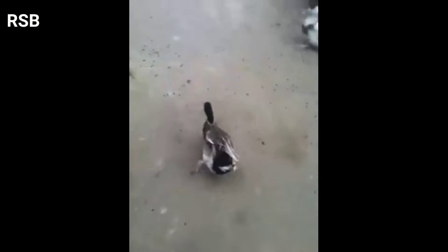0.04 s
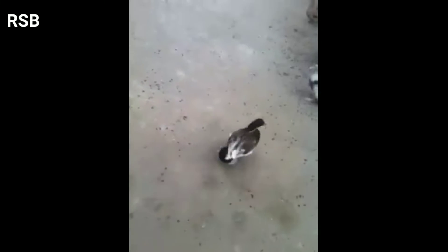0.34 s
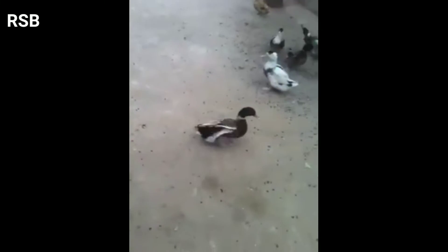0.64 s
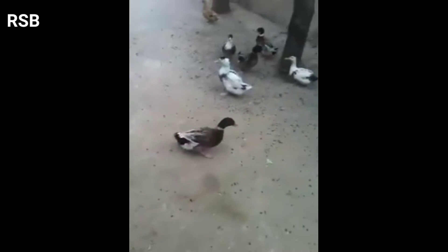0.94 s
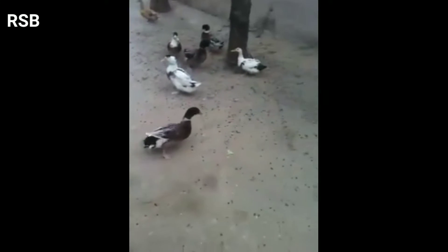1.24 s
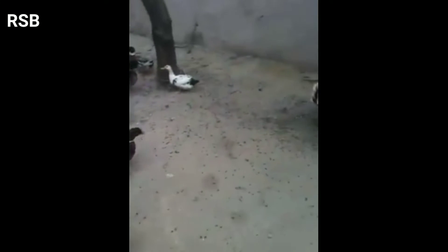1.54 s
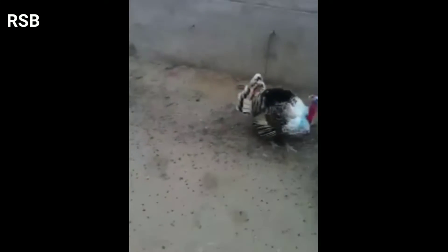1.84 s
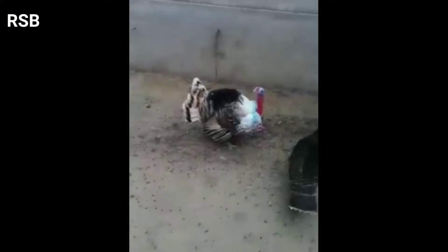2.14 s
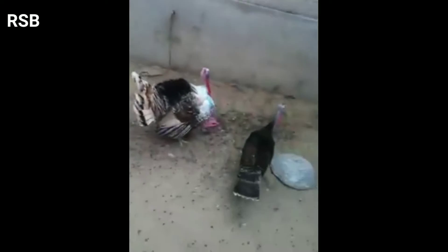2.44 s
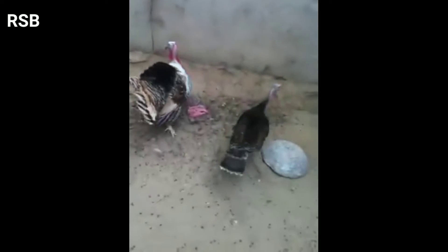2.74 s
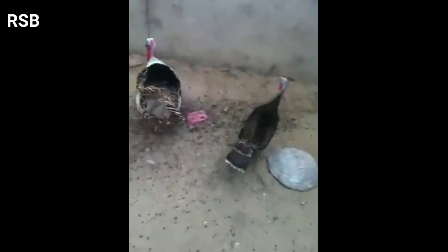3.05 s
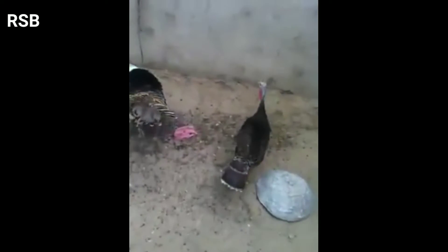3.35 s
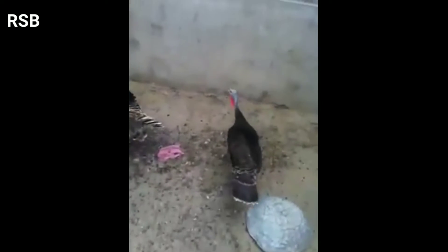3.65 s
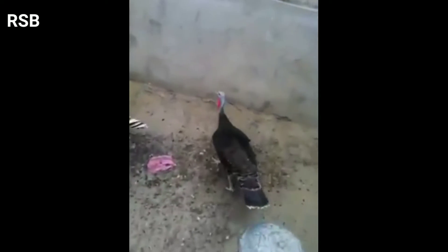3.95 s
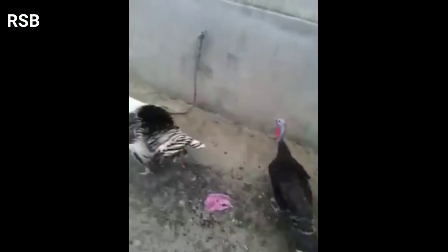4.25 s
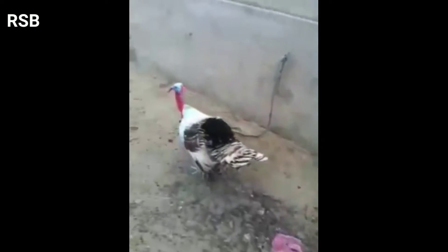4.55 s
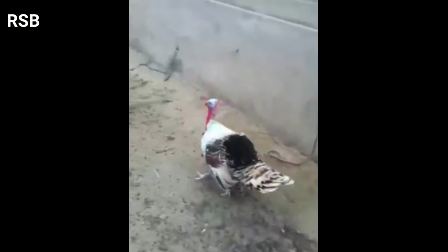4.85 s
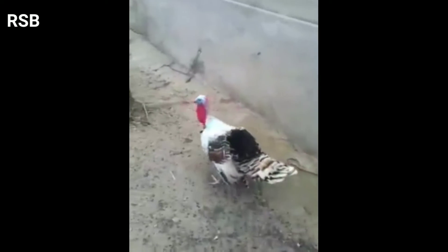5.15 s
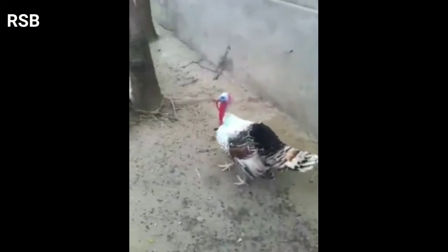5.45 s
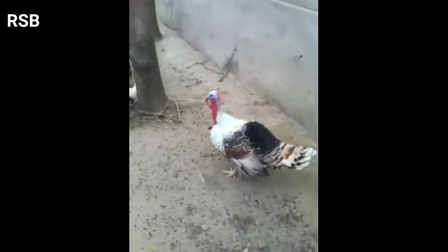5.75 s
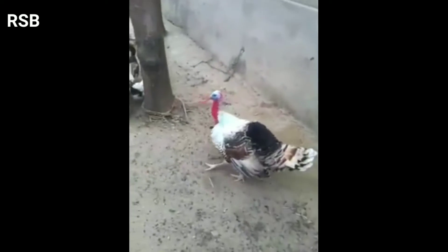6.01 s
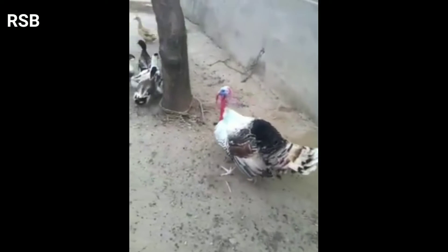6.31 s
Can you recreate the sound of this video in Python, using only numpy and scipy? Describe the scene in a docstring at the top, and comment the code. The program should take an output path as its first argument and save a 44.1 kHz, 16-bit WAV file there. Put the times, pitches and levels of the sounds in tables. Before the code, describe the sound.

One loud turkey yelp and gobble, followed by quiet raspy ducks, a few high peeps and light scuffs on dirt outdoors.

```python
"""A walled farmyard opens on outdoor air, a duck's hiss, soft bumps on the microphone and a faint far call.
At 0.24 s a close turkey yelps, overloading the microphone, then gobbles until 1.1 s: its syrinx sounds
a fast run of notes that leap in pitch and break up, shaped by windpipe and mouth. Behind it young birds
begin to peep and ducks keep up hisses (air through the bill) and rasps (flapping in the throat).
From 3.8 s feet scuff the dirt, and two more far calls come near the end. The walls return short echoes."""
import sys
import numpy as np
from scipy import signal
from scipy.fft import rfft, irfft, next_fast_len
from scipy.io import wavfile
from scipy.ndimage import map_coordinates

SR = 44100
rng = np.random.default_rng(int(sys.argv[2]) if len(sys.argv) > 2 else 0)


def unload_wav(signal):
    """Save mono or channel-first audio to the path in sys.argv[1] as 16-bit WAV at rate SR, clipped to [-1, 1]."""
    wavfile.write(
        sys.argv[1],
        SR,
        np.round(np.clip(np.atleast_2d(signal).T, -1, 1) * 32767).astype(np.int16),
    )


N = 281358

# Levels are relative within each table.
# outdoor background: (time [s], level [dB])
AIR_LEVELS = [(0, -44.5), (2.6, -49), (6.4, -48)]
# duck hisses: (centre time [s], level [dB], bill resonance [Hz])
HISS_PUFFS = [(.01, -54.5, 6070), (.18, -51, 4160), (1.069, -44, 3260), (1.26, -48.5, 3330),
              (1.426, -49, 5100), (1.59, -49.5, 5320), (1.887, -50, 5330), (2.137, -52, 4950),
              (2.507, -52.5, 5360), (2.754, -48.5, 3450), (2.931, -45.5, 3520), (3.161, -46, 4150),
              (3.358, -47, 5850), (3.57, -47.5, 5400), (3.803, -48.5, 4300), (4.437, -47, 3450)]
# bumps on the microphone: (time [s], thud level [dB], click level [dB])
MIC_BUMPS = [(.048, -32, -31), (0.058, -41, -53), (.072, -33.5, -45)]
# far calls and peeps: (start [s], end [s], first pitch [Hz], last pitch [Hz], level [dB])
FAR_NOTES = [(.13, .225, 337, 339, -49), (5.14, 5.33, 1220, 1184, -53), (5.86, 5.95, 983, 880, -45.5)]
PEEP_NOTES = [(1.115, 1.178, 3166, 4160, -48), (4.468, 4.535, 3165, 4200, -48.5),
              (5.045, 5.075, 3280, 3620, -47), (5.093, 5.135, 3550, 3240, -38.5),
              (5.818, 5.872, 3600, 4050, -42), (5.885, 5.945, 3050, 3530, -41)]
# course of the yelp: (time [s], pitch [Hz], level [dB], roughness [0-1], mouth resonance [Hz])
YELP_CONTOUR = [(.24, 608, -24.5, 0.22, 2050), (.252, 602.7, -19, 0.16, 2140),
                (.264, 594.5, -23.5, 0.58, 1670), (.294, 662, -21, 0.28, 1660),
                (0.314, 678.6, -13, 0.18, 1890), (.319, 739, -4, 0.14, 1520), (.325, 772, -8.5, 0.2, 1440),
                (.341, 786, -5.5, 0.21, 1390), (.347, 827.4, -15, 0.5, 1420), (.361, 820, -10, 0.47, 880),
                (0.375, 862.5, -21, 0.5, 1050), (.4, 810, -21, 0.83, 900)]
# gobble notes: (start [s], end [s], mid pitch [Hz], level [dB], roughness [0-1],
# share of the note before the beak shuts [0-1], lower voice gain [0-1])
GOBBLE_NOTES = [(0.341, 0.379, 640, -18, 0.08, .8, 0), (.403, 0.419, 755, -13.5, .1, .05, 0),
                (0.418, 0.446, 746, -23.5, 0.72, 1, 0.02), (0.452, .467, 719, -15, 0.31, 0.5, 0.01),
                (0.49, .505, 625, -12, 0.19, 1, 0.02), (.508, 0.549, 698, -16, .5, 1, 0),
                (0.544, 0.569, 611, -14, 0.46, 1, 0.57), (.554, 0.599, 764, -15.5, 0.41, 0.73, 0.01),
                (0.602, 0.648, 657, -25.5, 0.92, 1, 0.03), (.648, 0.672, 672, -21.5, 0.26, 0.01, 0.1),
                (0.678, 0.696, 637, -21, 0.28, 1, 0), (0.693, .709, 636, -15, 0.2, 0.04, 0.02),
                (.797, .822, 683.5, -23.5, 0.29, 0, 0.59), (0.859, .925, 618, -24.5, 0.52, 0.89, 0.02),
                (0.872, 0.894, 696, -25, 0.33, 0, 0.01), (0.992, 1.018, 671, -25.5, 0.34, 0, 0.72),
                (1.06, 1.089, 575.7, -25, .3, 0.68, 0.51)]
# louder duck rasps: (start [s], nominal length [s], rattle level [dB], air level [dB])
LOUD_RASPS = [(1.246, 0.044, -38.5, -66), (1.448, 0.049, -35.5, -50), (1.705, 0.072, -67, -49.5),
              (1.847, 0.056, -43, -49), (2.267, 0.083, -47, -47.5), (2.49, 0.055, -39.5, -53.5),
              (2.579, 0.098, -47, -49.5), (2.812, 0.1, -43.5, -47.5), (3.053, 0.068, -38.5, -51.5),
              (3.145, 0.07, -47, -49), (3.355, 0.077, -50, -48), (3.46, 0.079, -40, -60),
              (3.539, 0.044, -48, -58), (3.709, 0.071, -41.5, -51.5), (3.787, 0.064, -45, -63),
              (4.118, 0.06, -39, -55), (4.307, 0.088, -37.5, -50.5), (4.513, 0.062, -45, -54),
              (4.687, 0.057, -37, -65), (4.869, 0.092, -42, -47.5), (5.037, 0.09, -52, -48),
              (5.28, 0.061, -39.5, -55), (5.432, 0.091, -43.5, -51), (5.596, 0.089, -44, -51),
              (5.824, 0.052, -51, -47.5), (5.94, 0.11, -43, -52), (6.134, 0.11, -44.5, -49.5)]
# feet on dirt: (centre time [s], width [s], level [dB])
FOOT_SCUFFS = [(3.785, 0.05, -48.5), (3.98, 0.056, -43), (5.535, 0.039, -44.5), (5.69, 0.044, -45.5),
               (5.89, 0.058, -48), (5.98, 0.15, -47)]
# noise spectra of the sources: (frequency [Hz], level [dB])
AIR_SPECTRUM = [(24, -57), (40, -13), (64, -21.5), (138, 0), (200, 1.5), (933, -4.5), (1870, -4.5),
                (2780, -12.5), (5990, -21.5), (10900, -28.5), (12300, -26.5), (15000, -32.5)]
HISS_SPECTRUM = [(500, -27), (1200, -9.5), (2900, 3), (3600, 4.5), (6400, 3), (7500, -6.5), (10500, -12.5),
                 (14000, -41)]
THUD_SPECTRUM = [(40, -35), (250, -3), (1000, -24), (10000, -41)]
BREATH_SPECTRUM = [(100, -58), (210, -4.5), (350, -29), (600, -53), (1000, 3), (1600, -17), (1900, -13),
                   (4600, -16), (5300, -18), (8000, -30), (14000, -43.5)]
RASP_SPECTRUM = [(500, -30), (1250, -4), (1680, 0), (1920, 3), (2080, -2), (2400, -2.5), (2900, -9.5),
                 (3700, -18.5), (6000, -22.5), (12000, -48)]
SCUFF_SPECTRUM = [(80, -39), (200, 1), (450, -17.5), (900, -3.5), (3000, -16), (10000, -48)]
# resonances of the turkey's windpipe: (frequency [Hz], gain [dB])
WINDPIPE_RESPONSE = [(1500, -0.5), (1850, -16), (2080, 8), (2330, -0.5), (2650, 7), (3060, -11),
                     (3350, 12.5), (3700, 9.5), (4150, -4), (5000, -20), (7000, -40), (12000, -47)]
# reflections from the nearest walls: (delay [s], level [dB])
WALL_ECHOES = [(.026, -13), (.038, -15), (.058, -13)]


def undb(db):
    """Amplitude ratio of a level in decibels."""
    return 10 ** (np.asarray(db) / 20)


def unit(x):
    """Normalisation to rms 1."""
    return x / np.sqrt(np.mean(x ** 2) + 1e-18)


def colour(x, spectrum):
    """Spectral weighting that preserves the power of white noise."""
    hz, db = np.transpose(spectrum)
    bin_hz = np.maximum(np.fft.rfftfreq(2 * len(x), 1 / SR), 1)
    gain = unit(undb(np.interp(np.log(bin_hz), np.log(hz), db)))
    return irfft(rfft(x, 2 * len(x)) * gain)[:len(x)]


def noise(spectrum):
    """Filtered Gaussian noise of rms near 1."""
    return colour(rng.standard_normal(next_fast_len(N, True)), spectrum)[:N]


def wander(rate, size):
    """Smooth random modulation with spread near 1 and `rate` new values a second."""
    at = np.arange(size) * rate / SR
    return map_coordinates(rng.standard_normal(4096), [at + 2], order=3, mode="wrap")


def jittered_phase(hz, jitter, rate, size):
    """Phase as the integral of a frequency that wavers by the fraction `jitter`."""
    return 2 * np.pi * np.cumsum(hz * (1 + jitter * wander(rate, size))) / SR


def add(out, start, x):
    """Superposition of a sound from `start` seconds on."""
    i = max(int(start * SR), 0)
    out[..., i:i + x.shape[-1]] += x[..., :max(N - i, 0)]


def note(start, end, edge_s):
    """Progress 0-1 through a note, and an envelope whose raised-cosine edges reach past both ends."""
    length = max(end - start, .005)
    t = np.arange(int((length + 2 * edge_s) * SR)) / SR - edge_s
    ramp = np.clip((np.minimum(t, length - t) + edge_s) / (2 * edge_s), 0, 1)
    return np.clip(t / length, 0, 1), np.sin(ramp * np.pi / 2) ** 2


def swells(rows, steep):
    """Sum of bell-shaped envelopes from rows of (centre time [s], width [s], level [dB])."""
    out = np.zeros(N)
    for at, width, db in rows:
        start = max(at - 2 * width, 0)
        t = np.arange(start, at + 2 * width, 1 / SR)
        add(out, start, undb(db) * np.exp(-np.abs(2 * (t - at) / width) ** steep / 2))
    return out


def yard_air():
    """Ambient noise: a nearly steady outdoor background whose level flickers slightly."""
    flicker = undb(.8 * wander(14, N))
    level_db = np.interp(np.arange(N) / SR, *np.transpose(AIR_LEVELS))
    return noise(AIR_SPECTRUM) * undb(level_db) * flicker


def duck_hisses(puff_s=.081, bill_db=4, bill_q=6):
    """Cavity resonance: voiceless puffs pass through an open bill, tuned differently at each opening."""
    air = noise(HISS_SPECTRUM) * undb(wander(90, N))
    out = np.zeros(N)
    for at, db, bill_hz in HISS_PUFFS:
        bill = signal.lfilter(*signal.iirpeak(bill_hz, bill_q, fs=SR), air)
        out += swells([(at, puff_s, db)], steep=3.3) * (air + undb(bill_db) * bill)
    return out


def bumps(attack_s=.001, thud_s=.0094, click_s=.0025):
    """Damped impacts: each bump on the microphone is a dull thud and a tiny click, decaying exponentially."""
    out, t = np.zeros(N), np.arange(SR // 10) / SR
    for at, thud_db, click_db in MIC_BUMPS:
        thud = colour(rng.standard_normal(len(t)), THUD_SPECTRUM) * np.exp(-t / thud_s)
        thud *= np.minimum(t / attack_s, 1)
        click = colour(rng.standard_normal(len(t)), HISS_SPECTRUM) * np.exp(-t / click_s)
        add(out, at, undb(thud_db) * thud + undb(click_db) * click)
    return out


def whistles(rows, jitter, jitter_rate, octave_db, edge_s):
    """Frequency modulation: nearly pure, trembling tones glide and settle on their last pitch."""
    out = np.zeros(N)
    for start, end, first_hz, last_hz, db in rows:
        progress, envelope = note(start, end, edge_s)
        hz = last_hz + (first_hz - last_hz) * (1 - progress) ** 2.1
        phase = jittered_phase(hz, jitter, jitter_rate, len(hz))
        late_swell = 1.03 + .47 * np.sin(np.pi * progress ** 1.8)
        strength = envelope * late_swell * undb(db + 1.5 * wander(jitter_rate / 2, len(hz)))
        tone = np.sin(phase) + undb(octave_db) * np.sin(2 * phase)
        add(out, start - edge_s, np.sqrt(2) * strength * tone)
    return out


def far_calls():
    """Harmonic tones: faint, soft-edged calls, each a fundamental with a weak octave."""
    return whistles(FAR_NOTES, jitter=.04, jitter_rate=190, octave_db=-22, edge_s=.02)


def syrinx(hz, strength, rough, mouth_hz, jitter=.104, shimmer=.72, flutter_rate=550, mouth_q=9):
    """Source and filter: a voice that flutters when rough, as rows (mouth partials, buzz, air flow)."""
    def flutter():
        """Random amplitude modulation at constant mean power."""
        return (1 + shimmer * rough * wander(flutter_rate, size)) / np.hypot(1, shimmer * rough)

    size, rough = len(strength), np.clip(rough, 0, 1)
    phase = jittered_phase(hz, jitter * rough, flutter_rate, size)
    orders = np.arange(1, 5)
    ratio = np.outer(orders, hz) / mouth_hz
    gains = orders[:, None] ** -1.6 / np.hypot(1, mouth_q * (ratio - 1 / ratio))
    gains /= 1 + (ratio / 1.4) ** 8  # the mouth swallows partials above its resonance
    gains *= np.sqrt(2 / np.sum(gains ** 2, axis=0))
    partials = sum(gain * np.sin(k * phase) * flutter() for k, gain in zip(orders, gains))
    overtones = unit(sum(np.sin(k * phase) / k ** 3.2 for k in range(3, 8)))
    rasp = 2 * undb(-7) * rough * rng.standard_normal(size)
    buzz = unit((overtones + rasp) * flutter())
    buzz /= np.hypot(1, strength / undb(-15))  # the buzz stops growing in the loudest notes
    return strength * np.array([partials, undb(-11) * buzz, rough * np.ones(size)])


def yelp(edge_s=.004):
    """Pitch glide: the cry swoops up to full force, then roughens as the beak shuts; gives (start, sound)."""
    times, *controls = np.transpose(YELP_CONTOUR)
    progress, envelope = note(times[0], times[-1], edge_s)
    t = times[0] + progress * (times[-1] - times[0])
    hz, db, rough, mouth_hz = (np.interp(t, times, column) for column in controls)
    return times[0] - edge_s, syrinx(hz, envelope * undb(db), rough, mouth_hz)


def gobble(sag=.066, arch=.14, edge_s=.005, open_hz=1330, shut_hz=700, shut_s=.0048,
           low_hz=499.5, low_rough=.44, lead_s=.008, linger_s=.0315, low_open_hz=1010, low_shut_hz=893):
    """Biphonation: one side of the syrinx sings sagging notes, the other joins some at a lower pitch."""
    for start, end, hz, db, rough, open_share, low_gain in GOBBLE_NOTES:
        progress, envelope = note(start, end, edge_s)
        pitch = hz * (1 + sag * (.5 - progress))
        strength = envelope * undb(db) * (1 + arch * (np.sin(np.pi * progress) - 2 / np.pi))
        closure = .5 + .5 * np.tanh((progress - open_share) * (end - start) / shut_s)
        mouth_hz = open_hz + closure * (shut_hz - open_hz)  # the resonance drops as the beak shuts
        yield start - edge_s, syrinx(pitch, strength, rough, mouth_hz)
        if low_gain > 0:
            progress, envelope = note(start - lead_s, end + linger_s, edge_s)
            pitch = low_hz * (1 + sag * (.5 - progress))
            strength = low_gain * envelope * undb(db)
            mouth_hz = low_shut_hz + open_share * (low_open_hz - low_shut_hz)
            yield start - lead_s - edge_s, syrinx(pitch, strength, low_rough, mouth_hz)


def turkey(voice_db=1, breath_db=-8):
    """Tube resonance: the buzz of yelp and gobble rings the windpipe; air rushes where they are rough."""
    layers = np.zeros((3, N))
    for start, sound in [yelp(), *gobble()]:
        add(layers, start, sound)
    partials, buzz, flow = layers
    windpipe = unit(colour(buzz, WINDPIPE_RESPONSE)) * np.std(buzz)
    return undb(voice_db) * (partials + windpipe) + undb(breath_db) * flow * noise(BREATH_SPECTRUM)


def peeps():
    """Amplitude modulation: a fast random tremor roughens the high whistles of young birds."""
    tones = whistles(PEEP_NOTES, jitter=.056, jitter_rate=550, octave_db=-28, edge_s=.005)
    return tones * unit(1 + .5 * wander(800, N))


def duck_rasps(flap_hz=80, scatter=.17, decay_cycles=.155, throat_hz=1760):
    """Pulsed resonance: slow, uneven flapping kicks a throat resonance inside a broader puff of air."""
    start, length, rattle_db, puff_db = np.transpose(list(LOUD_RASPS) + flock_rasps())
    centre = start + length / 2
    cycle = jittered_phase(flap_hz, scatter, 60, N) / (2 * np.pi) % 1
    flaps = unit(cycle * np.exp(-cycle / decay_cycles))  # each swells fast and dies within its cycle
    throat = unit(np.sin(jittered_phase(throat_hz, .06, 200, N)))
    rattle = swells(zip(centre, .73 * length, rattle_db), steep=3.2) * flaps * throat
    puffs = swells(zip(centre, .98 * length, puff_db), steep=4.5) * noise(RASP_SPECTRUM)
    return undb(-2) * rattle + undb(5.5) * puffs


def flock_rasps(from_s=1.5, gap_s=.12, length_s=.097, rattle_db=-55.5, air_db=-57):
    """Timing jitter: soft rasps of the other ducks come at loose intervals, in rows like LOUD_RASPS."""
    slots = np.arange(from_s, N / SR, gap_s)
    return [(at + gap_s * late, length_s * (.5 + stretch), rattle_db, air_db)
            for at, (late, stretch) in zip(slots, rng.random((64, 2)))]


def scuffs():
    """Friction noise: feet rub the dirt in short, uneven swells."""
    return swells(FOOT_SCUFFS, steep=1.8) * noise(SCUFF_SPECTRUM) * undb(3 + 2 * wander(120, N))


def yard_echo(x, tail_db, t60_s, gap_s=.012):
    """Reflection: single echoes from the nearest walls and a diffuse tail follow the direct sound."""
    t = np.arange(int(.7 * SR)) / SR
    build_up = np.clip(t / gap_s - 1, 0, 1)
    response = rng.standard_normal(len(t)) * np.exp(-np.log(1000) * t / t60_s) * build_up
    response *= undb(tail_db) / np.sqrt(np.sum(response ** 2))
    for delay, db in WALL_ECHOES:
        response[int(delay * SR)] += undb(db)
    return x + signal.fftconvolve(x, response)[:N]


def scene():
    """Direct-to-reverberant ratio: the close turkey sounds drier than the birds further off."""
    close = yard_echo(turkey(), tail_db=-14, t60_s=.8)
    flock = duck_hisses() + far_calls() + peeps() + duck_rasps() + scuffs()
    distant = yard_echo(flock, tail_db=-10.5, t60_s=.72)
    return (yard_air() + bumps() + close + distant)[None]


def record(dry, bass_hz=90, top_hz=14900):
    """Band limiting and saturation: the microphone drops deep bass, flattens peaks and cuts the top."""
    x = signal.sosfilt(signal.butter(3, bass_hz, "high", fs=SR, output="sos"), dry)
    clipped = x / (1 + x ** 16) ** (1 / 16)
    return signal.sosfilt(signal.ellip(8, .2, 70, top_hz, fs=SR, output="sos"), clipped)


dry = scene()
out = record(dry)
unload_wav(out)
```